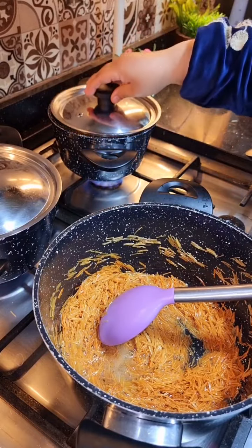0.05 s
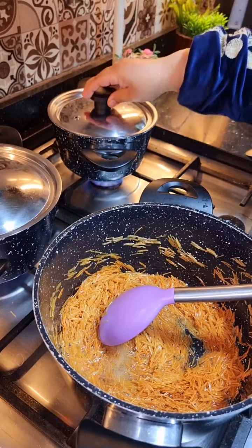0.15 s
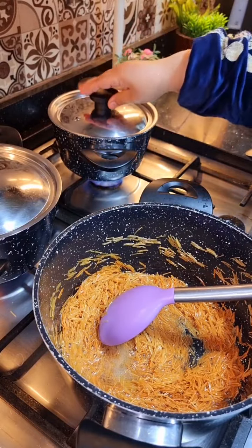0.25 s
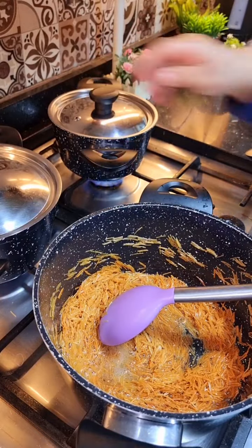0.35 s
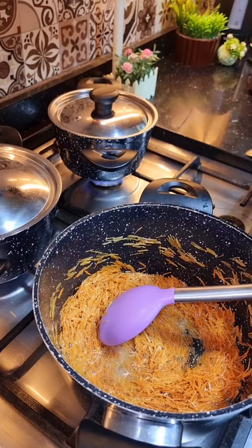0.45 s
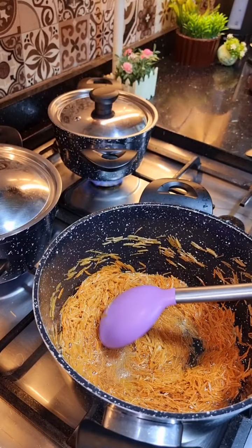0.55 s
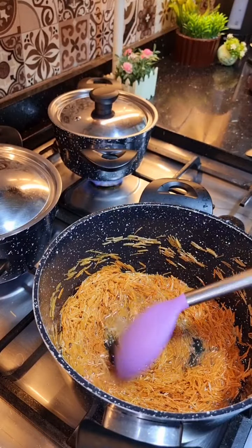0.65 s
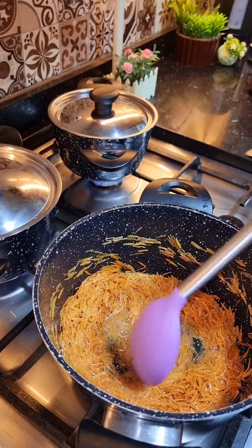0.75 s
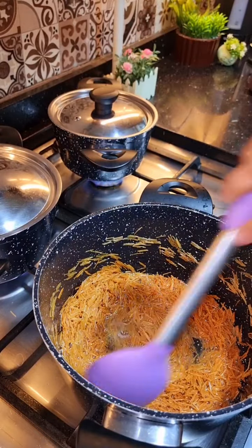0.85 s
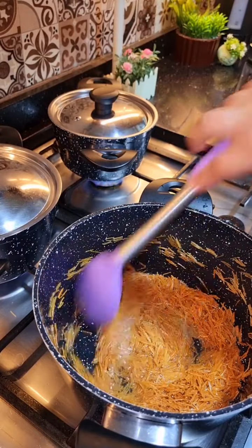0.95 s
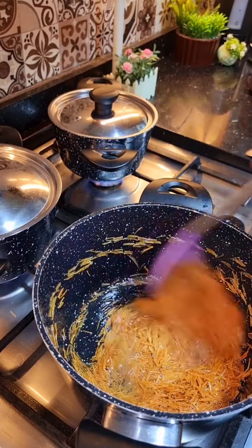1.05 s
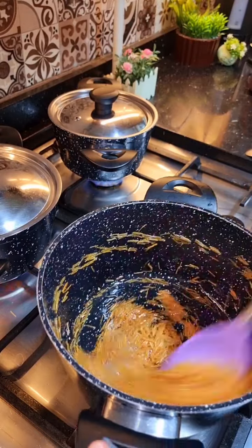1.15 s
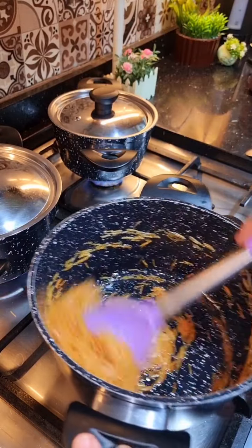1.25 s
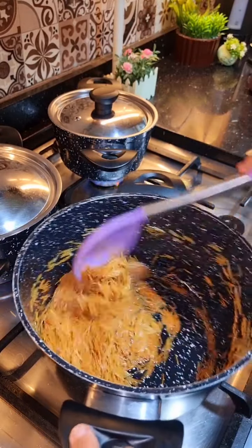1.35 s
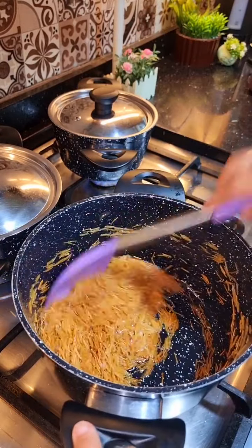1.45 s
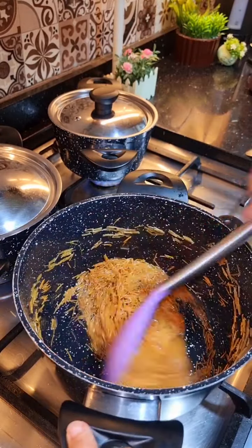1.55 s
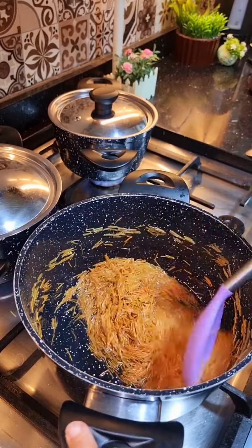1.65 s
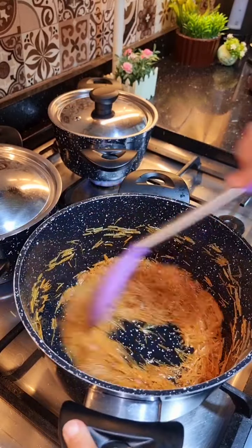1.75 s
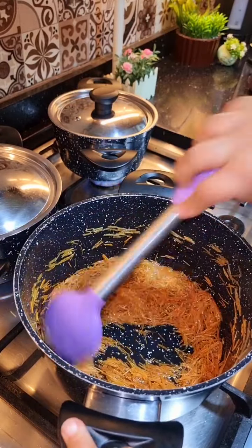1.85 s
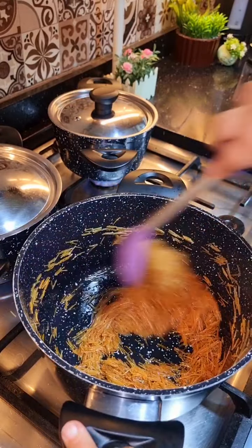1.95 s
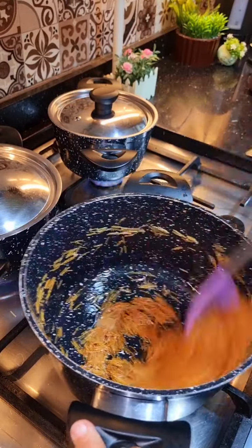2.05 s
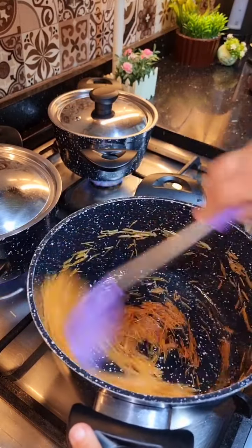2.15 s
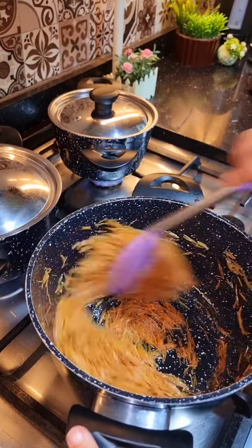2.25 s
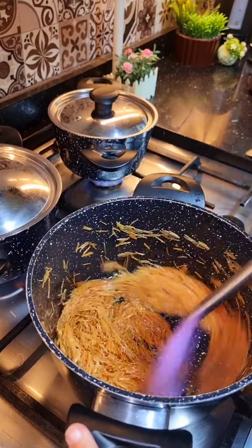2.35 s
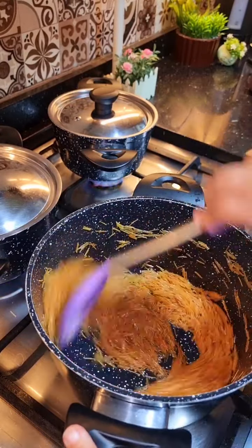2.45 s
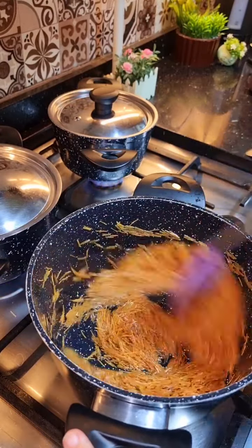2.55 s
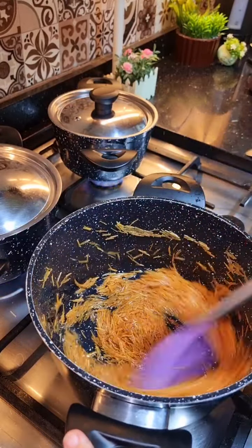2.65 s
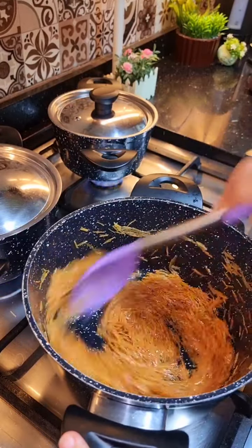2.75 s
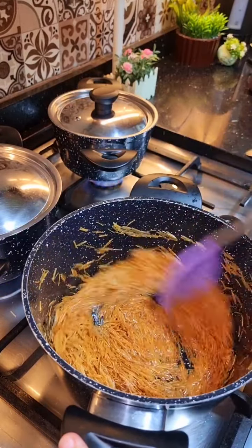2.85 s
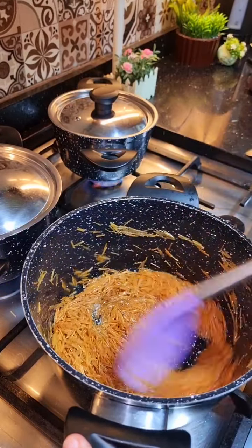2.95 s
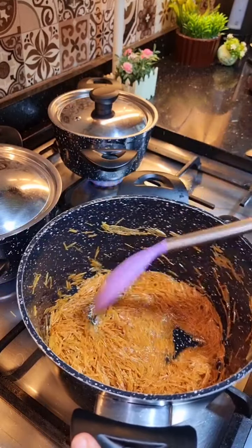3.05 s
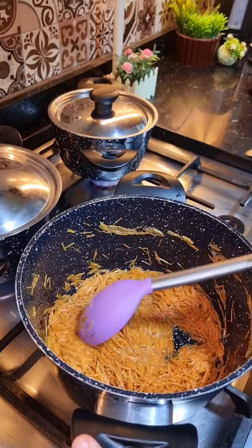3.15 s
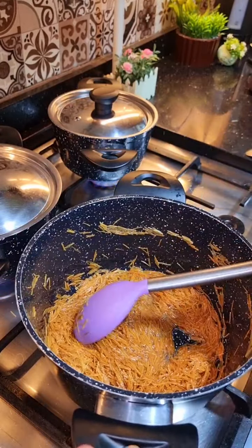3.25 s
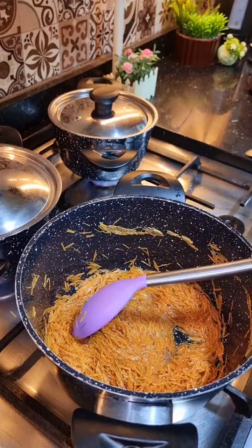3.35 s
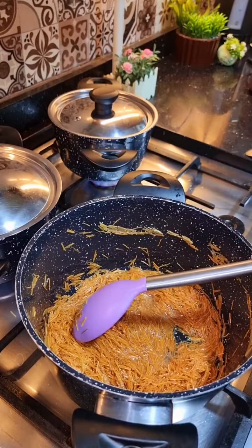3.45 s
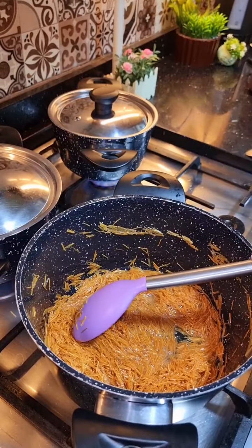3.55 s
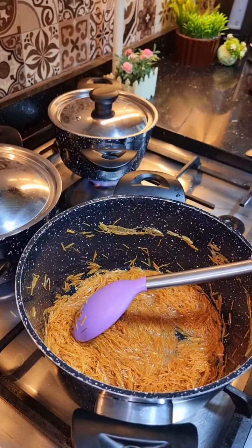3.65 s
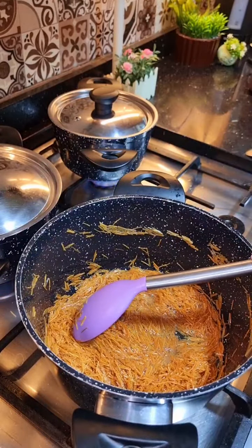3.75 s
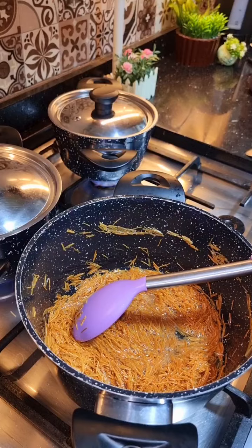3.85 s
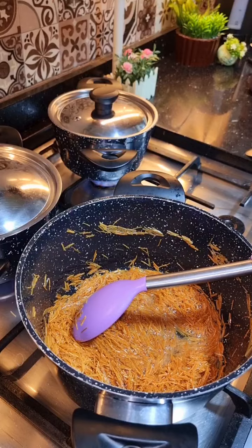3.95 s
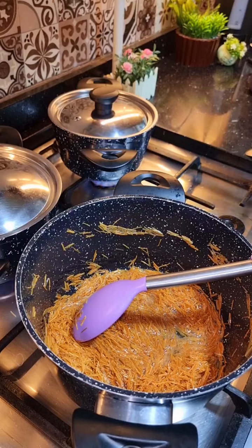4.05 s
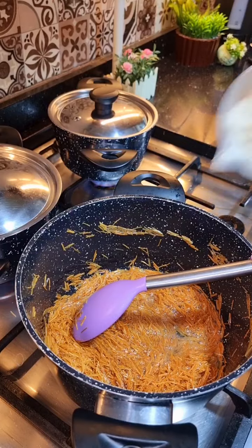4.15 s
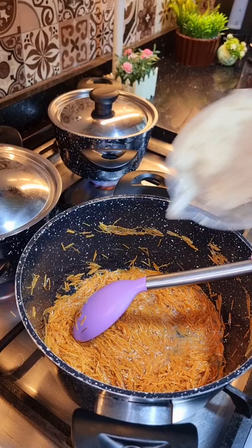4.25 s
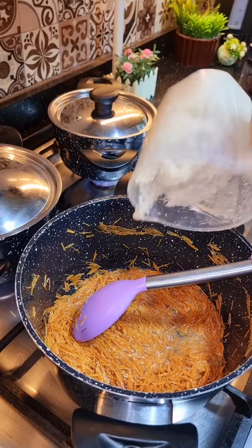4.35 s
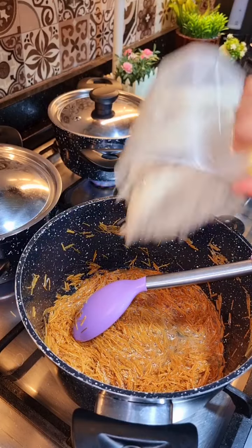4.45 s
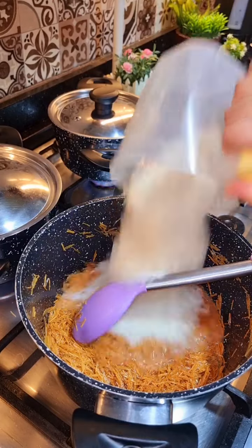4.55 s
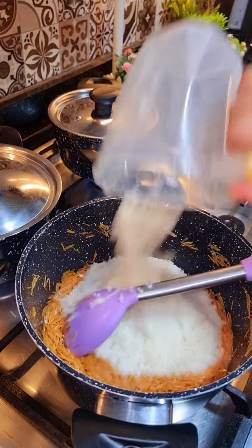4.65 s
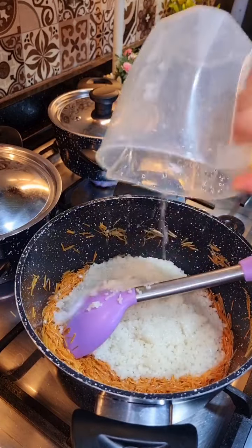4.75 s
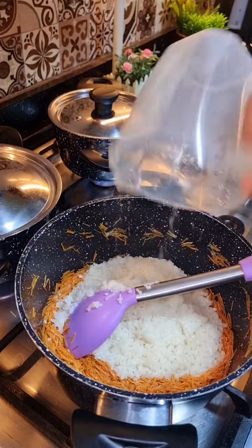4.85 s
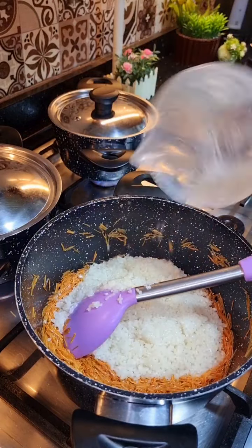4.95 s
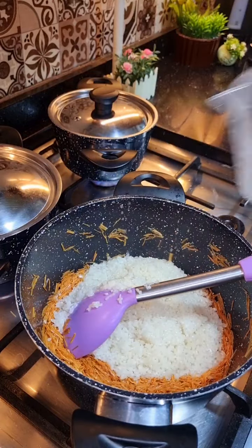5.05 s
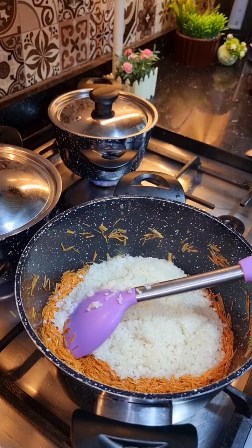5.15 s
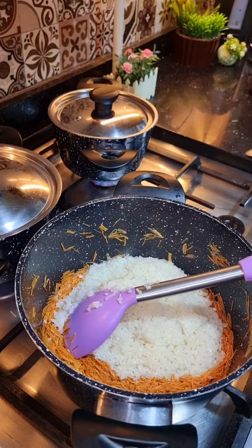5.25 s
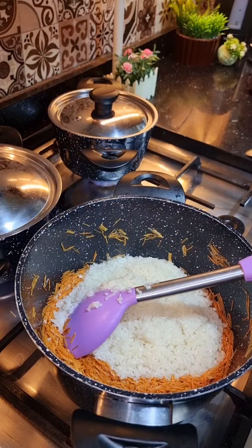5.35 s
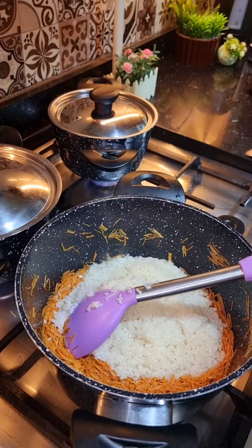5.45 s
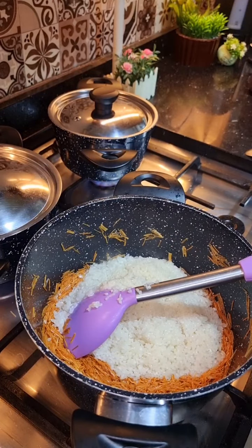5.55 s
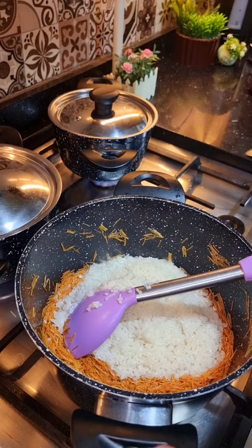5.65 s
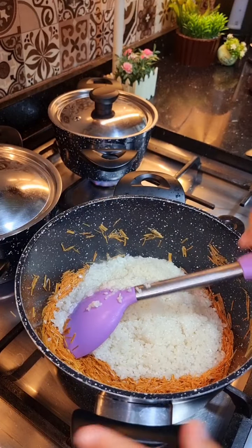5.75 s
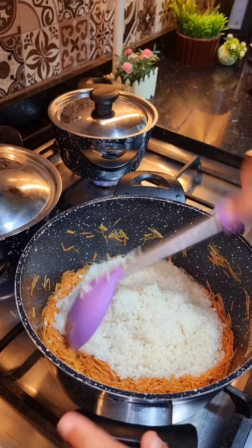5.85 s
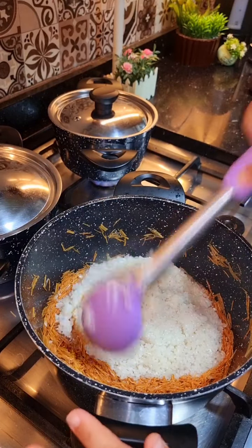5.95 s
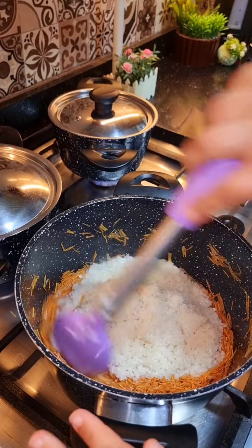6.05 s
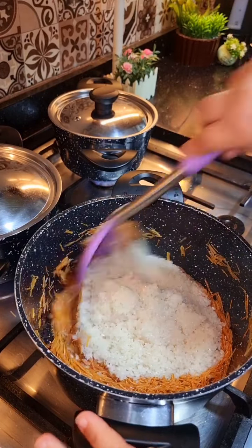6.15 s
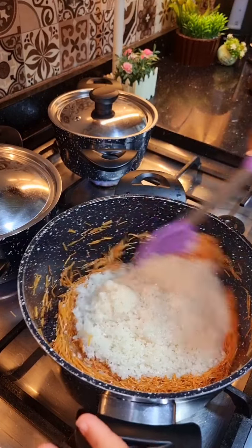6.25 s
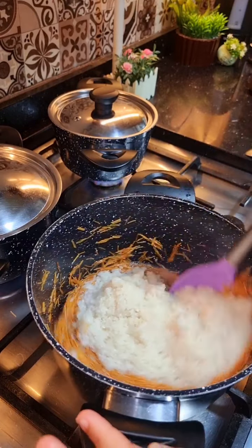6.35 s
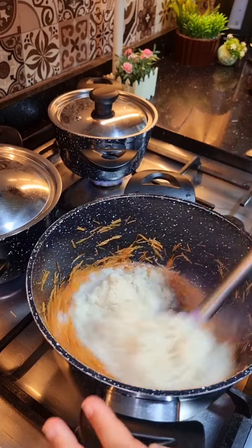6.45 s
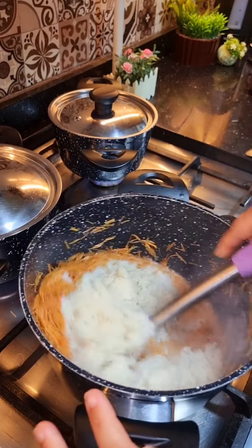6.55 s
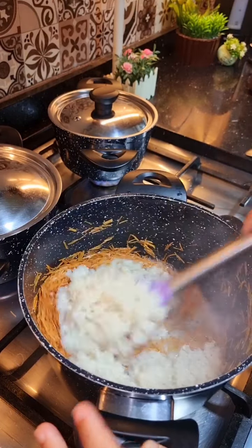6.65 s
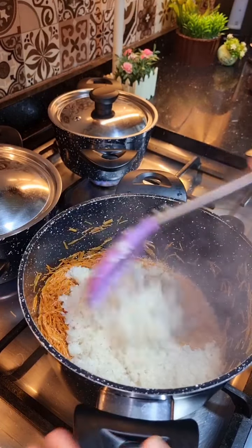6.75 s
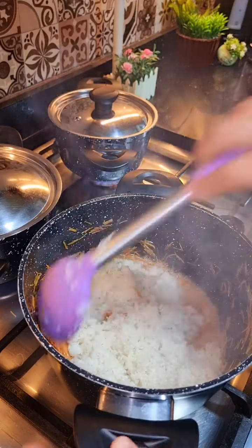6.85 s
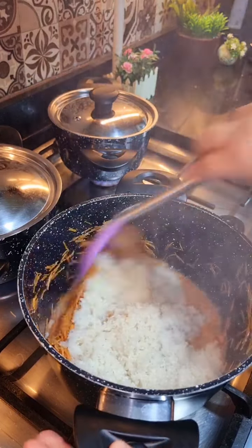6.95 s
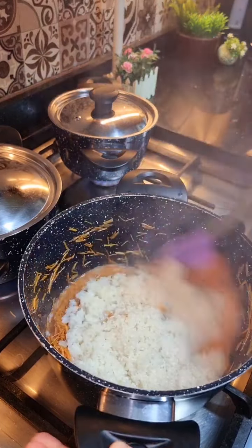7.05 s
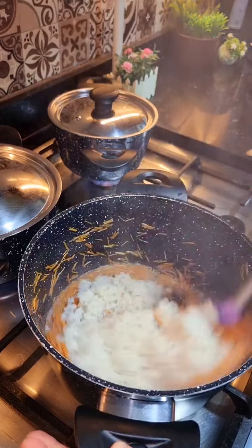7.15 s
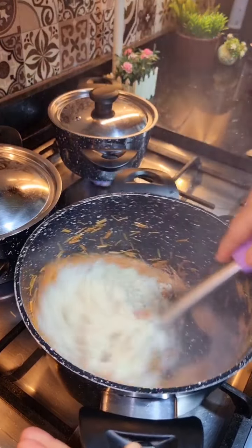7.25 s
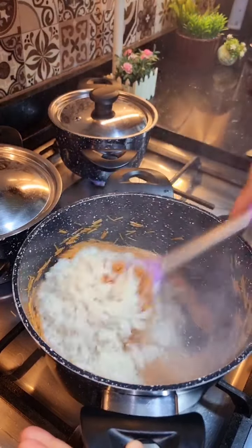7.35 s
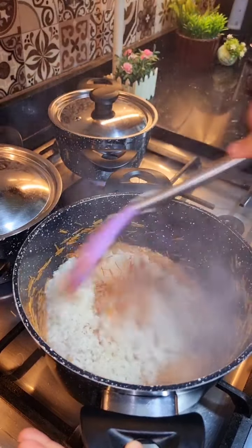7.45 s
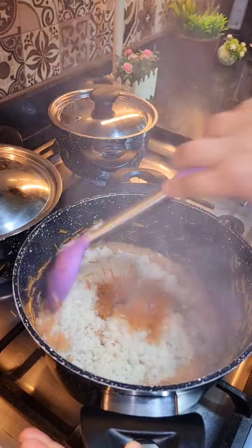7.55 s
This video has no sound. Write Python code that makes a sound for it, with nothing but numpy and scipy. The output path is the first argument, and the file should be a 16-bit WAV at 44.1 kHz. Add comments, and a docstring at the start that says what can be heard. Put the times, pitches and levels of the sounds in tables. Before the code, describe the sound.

Close stereo phone perspective in a small tiled kitchen, with soft burner and hood rumble throughout. At 0-0.2 s a steel lid rattles brightly onto a small pot; at 0.55 a nearby pan gives a short ringing knock. From 0.8 to 2.9 a spoon clinks on the rim and sweeps noodles in quick fizzing strokes, with faint scrapes, dull pot bumps and sharp fat spits. A dense crackle of pops peaks near 2.9, then thins through 4 as the frying quietens. Spoon clinks come at 4.15-4.25. At 4.47 wet rice lands and water flashes into a sudden bright sizzle that settles into steady frying. An empty plastic jug knocks hollowly on the counter at 5.4. About 6.1 the pot bumps softly and stirring lifts the sizzle to a much louder, dense, seething hiss, colored by the hollow pot, lasting to the end at about 7.6 s.

```python
"""Noodles fry in a deep pot in a tiled kitchen: bubbles burst in the fat, the pot's air rings and steam seethes below.
A hand seats a steel lid on a small pot, a nearby pan is nudged, and a spoon sweeps, scrapes and clinks while fat spits.
Wet rice is poured in, its water flashing into a loud sizzle, and an empty plastic jug is put down on the counter.
Metal and plastic ring as sums of decaying modes; burner and hood rumble as filtered noise; tiled walls answer."""
import sys
import numpy as np
from scipy import signal
from scipy.fft import rfft, irfft, next_fast_len
from scipy.io import wavfile
from scipy.ndimage import uniform_filter1d, map_coordinates

SR = 44100
rng = np.random.default_rng(int(sys.argv[2]) if len(sys.argv) > 2 else 0)


def elevation(decibels):
    """Turn decibel levels (scalar or array-like) into linear amplitude ratios."""
    levels = np.asarray(decibels, float)
    return 10 ** (levels / 20)


def generate_wav(sig):
    """Save sig (samples, or channels by samples) to the path in sys.argv[1] as 16-bit PCM at SR."""
    pcm = np.round(np.clip(np.atleast_2d(sig).T, -1, 1) * 32767).astype(np.int16)
    wavfile.write(sys.argv[1], SR, pcm)


N = 335160


def unit(x):
    """Scale to rms 1."""
    return x / np.sqrt(np.mean(x ** 2) + 1e-20)


def along(points, hz):
    """Read (f/Hz, value) points on a log frequency axis."""
    f, v = np.transpose(points)
    return np.interp(np.log(hz + 1), np.log(f + 1), v)


def wobble(rate):
    """A smooth random curve, rate knots a second."""
    knots = rng.standard_normal(int(N * rate / SR) + 4)
    return map_coordinates(knots, [np.arange(N) * rate / SR])


def swell(peak_s, rise_s, fall_s, db):
    """A rounded swell, 10 dB down rise_s before and fall_s after its peak."""
    t = np.arange(N) / SR - peak_s
    return elevation(db - 10 * (t / np.where(t < 0, rise_s, fall_s)) ** 2)


def filtered(x, response):
    """x times a complex response of frequency."""
    m = next_fast_len(N + 8192)
    return irfft(rfft(x, m) * response(np.fft.rfftfreq(m, 1 / SR)), m)[..., :N]


def shaped(x, spectrum):
    """x through a zero-phase filter given as (f/Hz, level/dB) points."""
    return filtered(x, lambda hz: elevation(along(spectrum, hz)))


def dulled(x, hz):
    """Gentle causal low-pass."""
    return signal.lfilter(*signal.butter(1, min(hz, .45 * SR), fs=SR), x)


# likeness of the two microphone ports: f/Hz, correlation
PORT_LIKENESS = [(30, 0.69), (60, 1), (250, 0.96), (700, 0.6), (1400, 0.083), (3000, 0.4), (6000, 0.26),
                 (12000, 0.014)]
# phase by which the left port leads the right: f/Hz, lead/rad
LEFT_LEAD = [(400, 0.26), (950, 2.23), (1400, 8.34), (1750, 6.77), (4000, 7.4), (6000, 7), (9000, 8.66)]


def ports(pair):
    """Two unrelated signals shared between the microphone ports, the left one leading."""
    turn = lambda hz: np.arccos(np.clip(along(PORT_LIKENESS, hz), -1, 1)) / 2
    mid, side = filtered(pair, lambda hz: np.array([np.cos(turn(hz)), np.sin(turn(hz))]))
    both = np.array([mid + side, mid - side])
    return filtered(both, lambda hz: np.exp(.5j * np.outer([1, -1], along(LEFT_LEAD, hz))))


def struck(hits, modes, crack, attack, rough, gain_db, loose=0, crack_s=0.0079):
    """Every blow rings the modes at new strengths; loose contact jitters their phase; soft blows lack treble."""
    out, t = np.zeros((2, N + SR)), np.arange(SR // 4) / SR
    hz, level, t60 = np.transpose(modes)[:, :, None]
    for s, db, *tilt in hits:
        # hardness tilts the modes in dB per octave about 300 Hz
        strength = level + 1.5 * rng.standard_normal(hz.shape) + sum(tilt) * np.log2(hz / 300)
        drift = np.cumsum(rng.standard_normal((len(hz), len(t))), axis=1) / np.sqrt(SR)
        jitter = rough * np.sqrt(hz) * drift
        jitter += loose * rng.standard_normal(hz.shape)  # a rim meets all round, so its modes start out of step
        rings = elevation(strength - 60 * t / t60) * np.exp(1j * (2 * np.pi * hz * t + jitter))
        at_ports = (np.exp(-1j * np.outer([0, 1], along(LEFT_LEAD, hz))) @ rings).imag
        heard = at_ports * (1 - np.exp(-t / attack))
        # contact noise fades above 6 kHz and falls 60 dB in crack_s
        contact = dulled(dulled(rng.standard_normal((2, len(t))), 6000), 6000)
        contact = crack * elevation(-60 * t / crack_s) * contact
        out[:, round(s * SR):][:, :len(t)] += elevation(db + gain_db) * (heard + contact)
    return out[:, :N]


# colour of burner and hood before levelling: f/Hz, level/dB per Hz
RUMBLE_COLOUR = [(15, -59), (25, -79), (43, -4), (166, 0), (301, -23), (384, -11.5), (607, -19), (988, -19),
                 (1130, -19), (1260, -34), (1400, -26), (3620, -87), (10100, -29.5), (14800, -56),
                 (16000, -50)]


def rumble():
    """Burner flame and hood airflow: shaped noise around -47 dB, its level drifting slowly."""
    air = shaped(rng.standard_normal((2, N)), RUMBLE_COLOUR)
    return elevation(-47 + 1.3 * wobble(2.5)) * unit(ports(air))


def bursts(per_s, spread_db, haze, patchy_db):
    """Two streams of bubble bursts of uneven size on a haze of countless small ones; colours come in patches."""
    size = elevation(spread_db * np.minimum(rng.exponential(1, (2, N)), 4))
    pops = (rng.random((2, N)) < per_s / SR) * size * rng.standard_normal((2, N))
    z = signal.stft(unit(pops) + haze * rng.standard_normal((2, N)), nperseg=512)[2]
    field = uniform_filter1d(rng.standard_normal(z.shape[1:]), size=3, axis=0)
    field = uniform_filter1d(field, size=8, axis=1)
    return signal.istft(z * elevation(patchy_db * unit(field)), nperseg=512)[1][:, :N]


# resonances of the air in the deep pot: f/Hz, width/Hz, level/dB
POT_AIR = [(1430, 206, 0.5), (1742, 151, 5), (1905, 130, 5), (2337, 820, -1.5), (2783, 260, 0.5),
           (3304, 44, -3.5), (4460, 710, -3.5)]


def cavity(f):
    """Causal response of the air inside the pot: resonances of alternating sign."""
    response = 0
    for k, (centre, width, db) in enumerate(POT_AIR):
        response = response + (-1) ** k * elevation(db) * 1j * f * width / (centre * centre - f * f + 1j * f * width)
    return response


# colour of small bursting bubbles, also of the spray from spits: f/Hz, level/dB per Hz
FIZZ_COLOUR = [(880, -18), (1500, -16.5), (1730, 1), (2030, -7.5), (2530, -2.5), (2940, 2.5), (5260, 4),
               (9040, 1), (14900, 0), (16000, -21), (16500, -82)]
# colour of the steam seething low in the pot: f/Hz, level/dB per Hz
SEETHE_COLOUR = [(150, -68), (250, -28.5), (594, -3), (671, -7.5), (764, 1.5), (895, 1.5), (1090, -9),
                 (1200, 1), (1400, -11), (1820, -104), (3080, -120)]
# how hard the pot boils, rising when the wet rice lands and again when it is stirred down: t/s, fizz level/dB
BOIL_COURSE = [(0, -52), (.3, -61.5), (.72, -60), (.86, -46.5), (1.2, -43.5), (1.32, -53), (1.8, -50),
               (1.92, -43), (2.8, -48), (3.0, -43.5), (3.2, -52), (3.6, -57), (4.1, -57), (4.2, -53.5),
               (4.455, -51.5), (4.475, -26.5), (4.5, -35), (4.6, -28), (4.75, -33.5), (5.0, -29),
               (5.26, -31.5), (5.4, -30), (5.75, -31.5), (6.11, -30), (6.19, -19.5), (6.5, -18.5),
               (6.9, -20.5), (7.0, -18.5), (7.3, -17.5), (7.6, -20.5)]
# the spoon sweeping noodles over hot fat: peak t/s, rise t/s, fall t/s, fizz level/dB, pot-air level/dB
SPOON_STROKES = [(.6, 0.064, 0.12, -51, -57.5), (.91, .1, 0.19, -35, -44), (1.12, 0.14, .17, -37.5, -62),
                 (1.42, 0.15, 0.13, -36, -66), (1.66, 0.054, 0.079, -34.5, -46.5),
                 (1.891, 0.058, 0.17, -34, -58), (2.07, 0.098, 0.16, -31, -46.5),
                 (2.23, 0.09, .1, -34.5, -58), (2.36, 0.07, 0.065, -32, -49), (2.49, 0.075, 0.14, -30, -62),
                 (2.63, .08, 0.1, -36, -70), (2.76, 0.061, 0.089, -32.5, -39.5),
                 (2.87, .08, 0.14, -39, -38.5)]


def frying():
    """Bubbles burst in the fat, coloured by the pot's air, over seething steam; strokes and flashing water add fizz."""
    full_boil_db = -20
    flash_s, flash_rise_s, flash_db, flash_fade_db_per_s = 4.475, 0.018, -26.5, 3.5
    seethe_lag_s = 0.053  # steam builds up late
    s, db = np.transpose(BOIL_COURSE)
    t = np.arange(N) / SR
    boil_db = np.interp(t, s, db)
    late_db = np.interp(t - seethe_lag_s, s, db)

    # water from the rice hisses on bare hot metal
    flash = elevation(flash_db - flash_fade_db_per_s * (t - flash_s) + 0.34 * wobble(5))
    flash = flash * np.clip((t - flash_s) / flash_rise_s + 1, 0, 1) ** 2
    fizz_strokes = sum(swell(*row[:4]) ** 2 for row in SPOON_STROKES)
    air_strokes = sum(swell(*row[:3], row[4]) ** 2 for row in SPOON_STROKES)
    bright = np.sqrt(elevation(boil_db) ** 2 + flash ** 2 + fizz_strokes)
    # pot air and steam grow by 0.95 and 0.81 dB per dB of boil
    deep = np.sqrt(elevation(-25 + 0.95 * (boil_db - full_boil_db)) ** 2 + air_strokes)
    steam = elevation(-33.5 + 0.81 * (late_db - full_boil_db) + 0.55 * wobble(5.4))
    churn = 0.5 * wobble(10) + 0.27 * wobble(35) + 0.36 * wobble(120)

    fizz = unit(shaped(bursts(2500, spread_db=2.0, haze=1.9, patchy_db=1.5), FIZZ_COLOUR))
    hollow = unit(filtered(bursts(1500, spread_db=1.0, haze=1.0, patchy_db=2.5), cavity))
    seethe = unit(shaped(bursts(600, spread_db=2.0, haze=1.7, patchy_db=2.0), SEETHE_COLOUR))
    hollow_level = deep * elevation(churn + 0.24 * wobble(3.89))
    return ports(bright * elevation(churn) * fizz + hollow_level * hollow + steam * seethe)


# lid rim touching the small pot: t/s, level/dB, hardness/dB per octave
LID_SEATS = [(.010, -23.5, 0.5), (.017, -19.5, 0), (.028, -17, -1.5), (.047, -16.5, -1.5), (.062, -28, 0),
             (.106, -13.5, 0.5), (.118, -23.5, 2.5), (.131, -13, -0.5), (.147, -19.5, -1),
             (.158, -23.5, -1)]
# ringing of the steel lid: f/Hz, level/dB, t60/s
LID_MODES = [(195, -11, 0.056), (373, -6, 0.076), (485, -16.5, 0.09), (601, -6, .09), (763, 1, 0.057),
             (790, -21, 0.046), (1825, -5.5, 0.098), (1812, -11, 0.24), (2042, 5, 0.038),
             (2810, -13, 0.082), (3240, -10.5, 0.11), (3700, -3, 0.096), (4010, 6, 0.086),
             (4127, 2.5, 0.16), (4740, -3.5, 0.24), (5320, -6, 0.068), (5530, -14, 0.13),
             (5700, -15.5, 0.25), (6360, -26, 0.22), (7000, 0.5, 0.058), (7400, -11, 0.083),
             (8220, -5, 0.067), (8800, 0.5, 0.057), (9250, -28, .15), (9750, -8.5, .15),
             (10300, -5.5, 0.081), (10900, -11, .13), (11880, -8, 0.098), (13000, -20, 0.071),
             (14200, -23, 0.064)]


def lid_seating():
    """The steel lid rattles onto its rim: bright modes out of step, with long contact noise."""
    return struck(LID_SEATS, LID_MODES, crack=1.03, attack=0.000083, rough=0.16, gain_db=-7,
                  loose=1.3, crack_s=0.058)


# decay of the tiled kitchen: f/Hz, t60/s
KITCHEN_DECAY = [(150, 0.19), (1000, 0.23), (4000, 0.21), (12000, 0.15)]


def kitchen(x):
    """Tiled walls answer; each frequency dies at its own speed."""
    hz, t, z = signal.stft(rng.standard_normal((2, SR // 2)), SR, nperseg=256)
    fade = elevation(-60 * t / along(KITCHEN_DECAY, hz)[:, None])
    tail = signal.istft(z * fade, SR, nperseg=256)[1]
    late = np.pad(x, ((0, 0), (200, 0)))  # the walls answer 200 samples late
    return ports(signal.fftconvolve(late, tail / np.linalg.norm(tail[0]), axes=1)[:, :N])


# a nearby pan nudged on the stove: t/s, level/dB
PAN_NUDGES = [(.541, -23)]
# ringing of that pan: f/Hz, level/dB, t60/s
PAN_MODES = [(86, -1, 0.53), (308, 0, 0.16), (453, -6.5, 0.14), (666, -6, 0.052), (875, -1.5, 0.17),
             (1115, -2.5, 0.079), (1576, -9, 0.21), (2600, -10.5, 0.099), (3700, -19, .05),
             (5330, -11, .06), (6150, -12, 0.099)]


def pan_nudge():
    """The nudged pan rings from a deep hum up to treble, with a short crack of contact."""
    return struck(PAN_NUDGES, PAN_MODES, crack=0.45, attack=0.0008, rough=0.41, gain_db=-7)


# the spoon dragging over the pot floor: peak t/s, length/s, hum f/Hz at the peak, glide/Hz per s, level/dB
FLOOR_SCRAPES = [(.75, .1, 1150, 100, -59), (1, 0.29, 1440, -600, -51.5), (1.4, 0.13, 372, -50, -49.5),
                 (2.32, 0.22, 868, -100, -49), (2.69, 0.1, 804, -900, -48), (4.26, .06, 1500, -3000, -52)]


def scrape():
    """Stick-slip friction hums in a narrow band that moves with the stroke."""
    rise_share = 0.44  # share of the length spent swelling
    t = np.arange(N) / SR
    grip = filtered(rng.standard_normal((2, N)), lambda f: 1 / (1 + (f / 70) ** 2))
    grip = (grip[0] + 1j * grip[1]) / np.std(grip[0])
    out = 0
    for s, length, hz, glide, db in FLOOR_SCRAPES:
        hum = np.exp(2j * np.pi * (hz + glide * (t - s) / 2) * (t - s))
        level = swell(s, rise_share * length, (1 - rise_share) * length, db)
        out = out + level * (grip * hum).real
    return out


# single spits of fat: t/s, pop level/dB, pop f/Hz, pot-air ping level/dB
FAT_SPITS = [(0.816, -32, 5000, -59), (1.4116, -15.5, 3850, -50), (1.792, -30, 6430, -45),
             (1.8127, -22, 3580, -39), (2.1022, -18, 5700, -28), (2.3072, -24, 5520, -34),
             (2.4598, -15, 6500, -31), (2.5341, -24, 6500, -34), (2.7401, -15.5, 2840, -28),
             (2.759, -12, 4700, -37), (2.7768, -11, 4100, -40), (2.785, -15, 3160, -40),
             (2.83, -14, 3700, -37), (2.8519, -9.5, 8800, -13.5), (2.8644, -18, 2910, -14),
             (2.8732, -7.5, 11200, -35), (2.884, -17, 2880, -9), (2.8875, -15, 4800, -18),
             (2.8936, -5.5, 2700, -19), (2.9322, -15, 2700, -18), (2.9771, -17, 4250, -23),
             (3.002, -16, 4700, -26), (3.0144, -20, 3700, -24), (3.0485, -15, 4800, -27),
             (3.0678, -12, 4600, -33), (3.0772, -30, 5100, -27), (3.133, -18, 4470, -33),
             (3.1473, -30, 3000, -51), (3.2098, -19, 4400, -32), (3.2191, -20, 4530, -32),
             (3.2762, -25.5, 5700, -48), (3.2948, -23, 3500, -36), (3.3308, -22, 4640, -23),
             (3.3903, -21, 2820, -26), (3.3962, -19, 4600, -22.5), (3.4342, -23, 4870, -52),
             (3.4625, -16.5, 6960, -23), (3.4815, -21, 3240, -32), (3.485, -23, 2840, -30),
             (3.5224, -19, 4900, -34), (3.5403, -24, 4400, -27), (3.5467, -28, 5700, -42),
             (3.5724, -28, 10500, -49), (3.5806, -26, 10600, -54), (3.6639, -15.5, 5050, -39),
             (3.6703, -26, 4700, -38), (3.6817, -17, 6700, -42), (3.6865, -29, 4200, -38),
             (3.7323, -17.5, 5030, -37), (3.7916, -24, 12400, -51), (3.867, -26, 7800, -49),
             (3.8907, -26, 3600, -32), (4.0397, -28, 9700, -46), (4.053, -24, 4730, -50),
             (4.3064, -25, 9400, -55), (4.3426, -25, 7400, -37), (4.468, -24, 4500, -25),
             (4.486, -25, 5000, -33)]


def spits():
    """Each big bubble pops in a few cycles, clicks, pings the pot's air and throws a short spray."""
    pops, spray, t = np.zeros((2, N + SR)), np.zeros((2, N + SR)), np.arange(1500) / SR
    for s, pop_db, hz, ping_db in [*FAT_SPITS, *small_spits(count=110)]:
        # spray follows the pop by 0.55 dB per dB and thins by 3.5 dB per s as the fat cools
        spray_db = -11.5 + 0.55 * pop_db - 3.5 * s + 3.0 * rng.standard_normal()
        bend, lean = rng.standard_normal(2)
        pop = elevation(pop_db - 60 * t * hz / 14) * np.sin(2 * np.pi * hz * t) * (1 - np.exp(-t * hz * 1.02))
        # the bubble skin tears: a broad click under the pop, t60 1.4 ms
        click = elevation(pop_db - 9 - 60 * t / 0.0014) * rng.standard_normal((2, len(t)))
        ping_phase = 2 * np.pi * 1750 * (1 + 0.067 * bend) * t - [[0], [.4]]
        ping = elevation(ping_db - 60 * t / 0.013) * np.sin(ping_phase) * (1 - np.exp(-t / 0.00029))
        sides = elevation(2.4 * lean * np.array([[1], [-1]]))
        # the spray fades above three times the pop's pitch
        hiss = dulled(rng.standard_normal((2, len(t))), 3 * hz)
        pops[:, round(s * SR):][:, :len(t)] += (pop + ping + click) * sides
        spray[:, round(s * SR):][:, :len(t)] += elevation(spray_db - 60 * t / 0.031) * hiss
    return pops[:, :N] + shaped(spray[:, :N], FIZZ_COLOUR)


def small_spits(count):
    """Lesser pops at random, crowded early, while the noodles rest: rows like the large ones."""
    rest_s, rest_length_s, thinning = 2.96, 1.4, 1.5
    when, size, pitch, ping = rng.random((count, 4)).T
    s = rest_s + rest_length_s * when ** thinning
    return np.transpose([s, -39 + 13 * size ** 3.0, 3000 * 3.5 ** pitch, -54 + 20 * ping ** 1.5])


# spoon shaft on the rim: t/s, level/dB, hardness/dB per octave
SPOON_HITS = [(.837, -21.5, 2.5), (.8418, -23, 0.5), (4.135, -37, -12), (4.140, -23.5, 1.5),
              (4.197, -31, 0.5), (4.253, -12, -7), (4.27, -23, -7)]
# ringing of spoon shaft and rim: f/Hz, level/dB, t60/s
SPOON_MODES = [(480, -8.5, 0.027), (800, -8, 0.033), (1316, 0.5, 0.02), (1555, -19, 0.078),
               (2000, -6, 0.013), (2850, -17, 0.25), (2830, 3.5, 0.012), (3370, -1, 0.014),
               (4230, -7, 0.08), (4120, 0.5, 0.022), (6700, -27, .15)]


def spoon_clinks():
    """The spoon shaft clinks on the rim: mostly short modes and a strong crack."""
    return struck(SPOON_HITS, SPOON_MODES, crack_s=0.0073, crack=0.92, attack=0.00051, rough=0.37, gain_db=-8.5)


# dull bumps of the big pot on its grate: t/s, level/dB, hardness/dB per octave, boom level/dB
POT_BUMPS = [(0.867, -38, 1.5, -69), (1.352, -47.5, 4, -69), (1.61, -43, -13, -44), (2.504, -36.5, -6, -43),
             (2.719, -43, 4, -62), (2.846, -44, -8, -53), (2.925, -35, -2.5, -41), (3.157, -30, -10, -38.5),
             (3.19, -48, -7, -45), (3.229, -44.5, 4, -60), (4.478, -35, 4, -46), (4.547, -31, 5.5, -46),
             (6.049, -43, -6, -43), (6.12, -39, -10, -43.5), (6.948, -38, -14.5, -42)]
# ringing of the big pot: f/Hz, level/dB, t60/s
POT_MODES = [(151.2, -7, 0.42), (222.6, 0.5, 0.14), (300, -11, 0.36), (373, 8.5, 0.092), (457.4, 7, 0.092),
             (575, 1, 0.12), (660, -1.5, 0.068), (910, 0, 0.092), (1070, -4, 0.089)]


def pot_bumps():
    """The big pot bumps on its grate: low modes with a soft attack and little crack."""
    hits = [row[:3] for row in POT_BUMPS]
    return struck(hits, POT_MODES, crack=.05, attack=0.0021, rough=0.75, gain_db=-8.0)


# the stove top booming under the pot: f/Hz, level/dB, t60/s
GRATE_MODES = [(84.4, 7, 0.44), (102.4, 6, 0.28)]


def grate_boom():
    """Each pot bump also sets off two slow, deep modes of the stove top."""
    hits = [row[::3] for row in POT_BUMPS]  # time and boom level
    return struck(hits, GRATE_MODES, crack=0, attack=0.053, rough=0.11, gain_db=8.5)


# the empty plastic jug meeting the counter: t/s, level/dB
JUG_HITS = [(5.382, -12)]
# ringing of the jug: f/Hz, level/dB, t60/s
JUG_MODES = [(362, -26.5, 0.17), (674, -1.5, 0.11), (756, 0.5, 0.12), (785, -10, 0.043), (836, -2, 0.22),
             (910, -8, 0.15), (1035, -1.5, 0.038), (1426, -8, 0.037)]


def jug_set_down():
    """The empty jug knocks hollowly on the counter: midrange modes with almost no crack."""
    return struck(JUG_HITS, JUG_MODES, crack=.02, attack=0.0017, rough=0.57, gain_db=-2.0)


def scene():
    """All sources; the knocks and spits excite the room."""
    knocks = lid_seating() + pan_nudge() + spoon_clinks() + pot_bumps() + grate_boom() + jug_set_down()
    pops = spits()
    room = kitchen(elevation(-5) * knocks + elevation(-8.5) * pops)
    mix = knocks + pops + room + frying() + scrape() + rumble()
    return mix * elevation([[-.45], [.45]])  # left and right trim in dB


def band_limit(x):
    """A steep low-pass at the top of the band."""
    return signal.sosfilt(signal.butter(12, 16690, fs=SR, output="sos"), x)


def record(dry):
    """The phone's microphones drop the deep bass below about 60 Hz and everything from 15.9 kHz up."""
    cut = filtered(dry, lambda hz: (1j * hz / 60 / (1 + 1j * hz / 60)) ** 4 * (hz < 15900))
    return band_limit(cut)


dry = scene()
out = record(dry)
generate_wav(out)
```